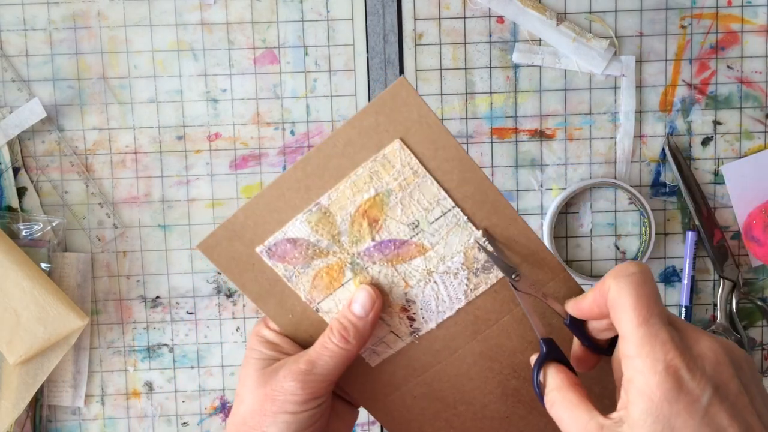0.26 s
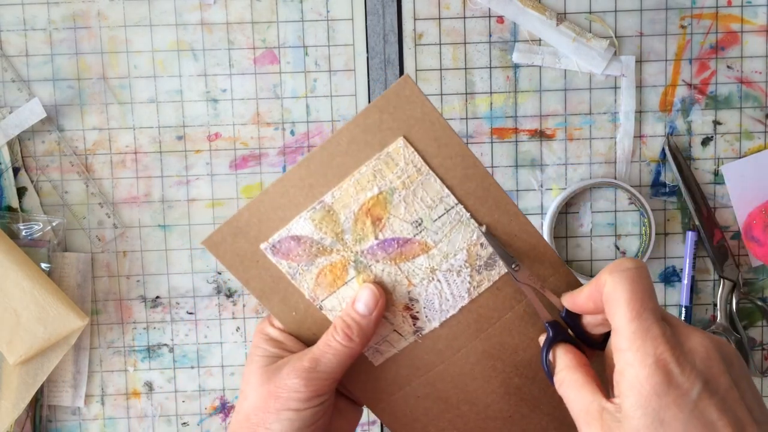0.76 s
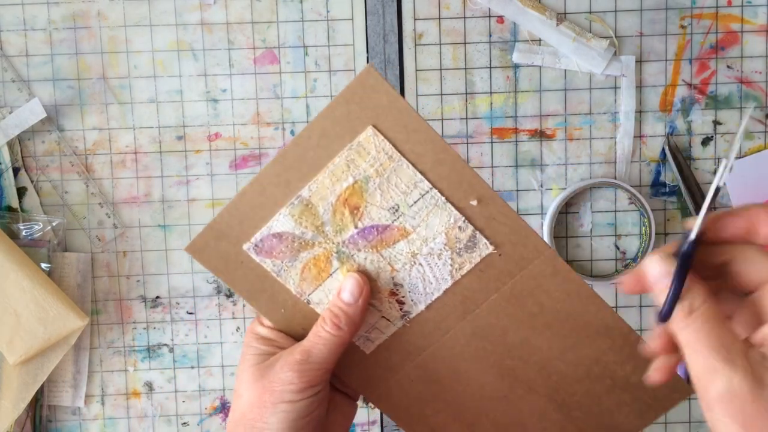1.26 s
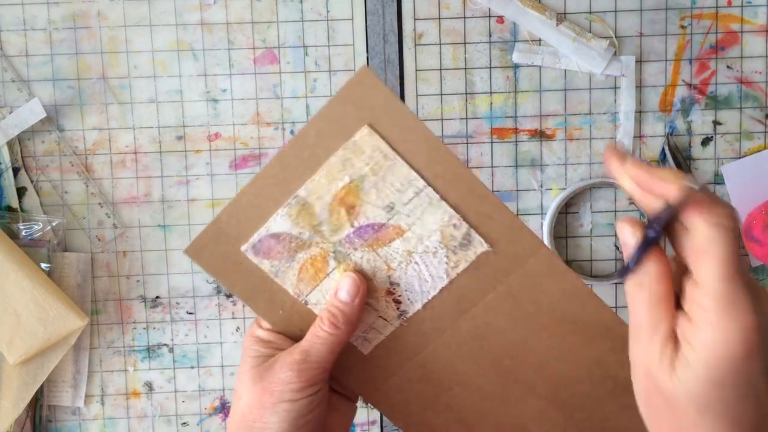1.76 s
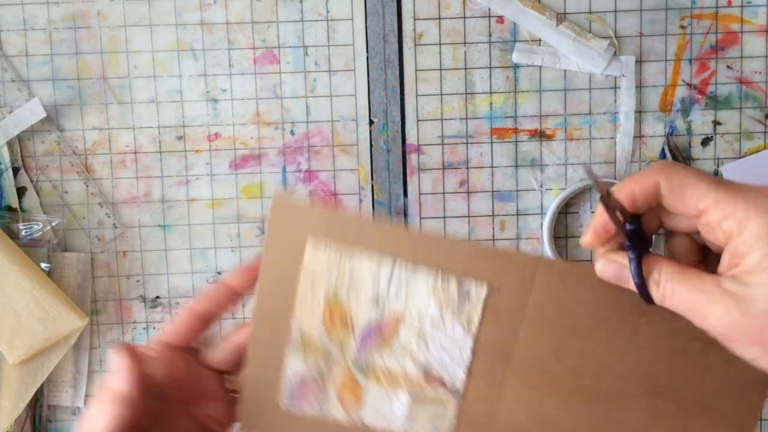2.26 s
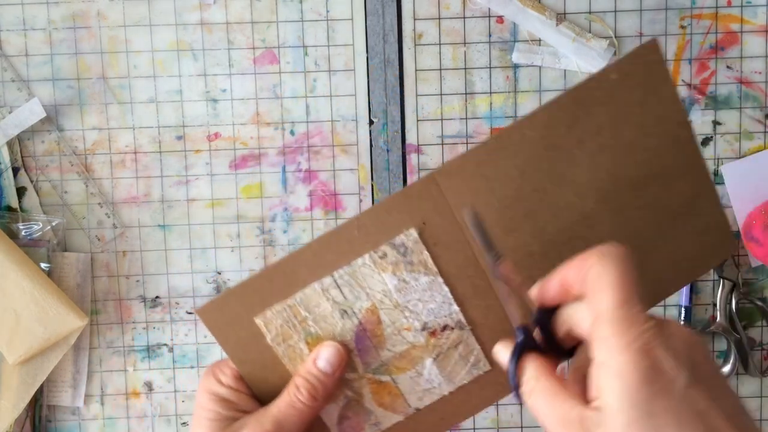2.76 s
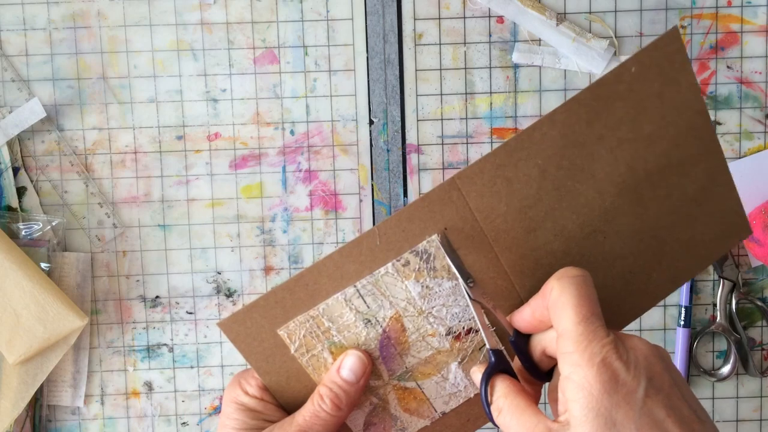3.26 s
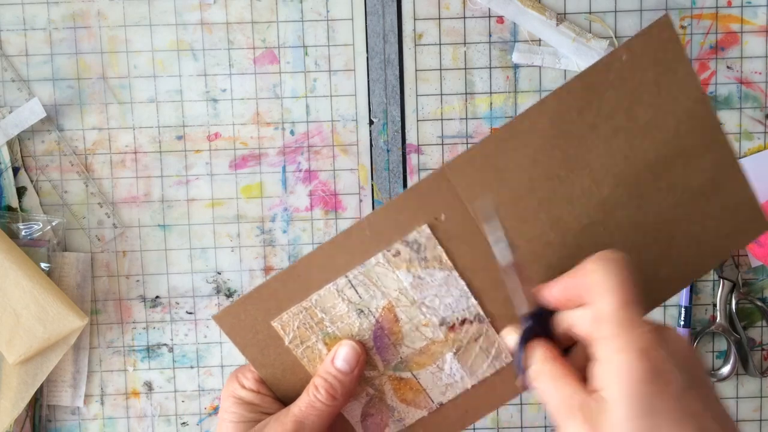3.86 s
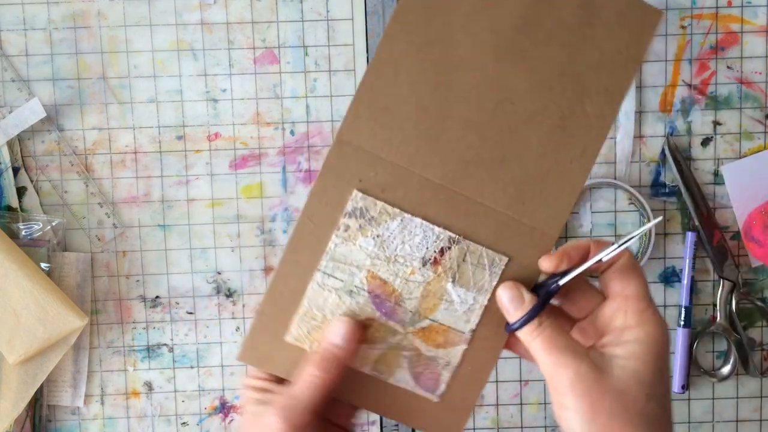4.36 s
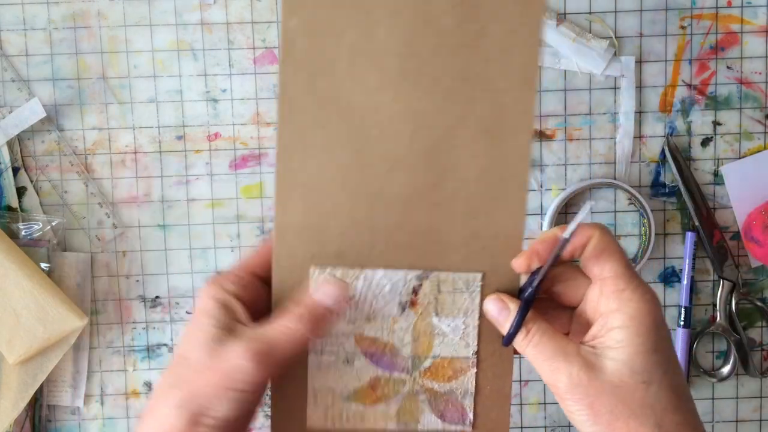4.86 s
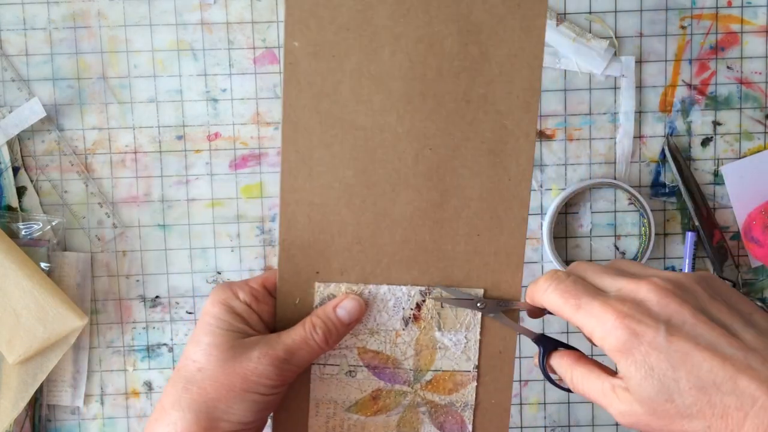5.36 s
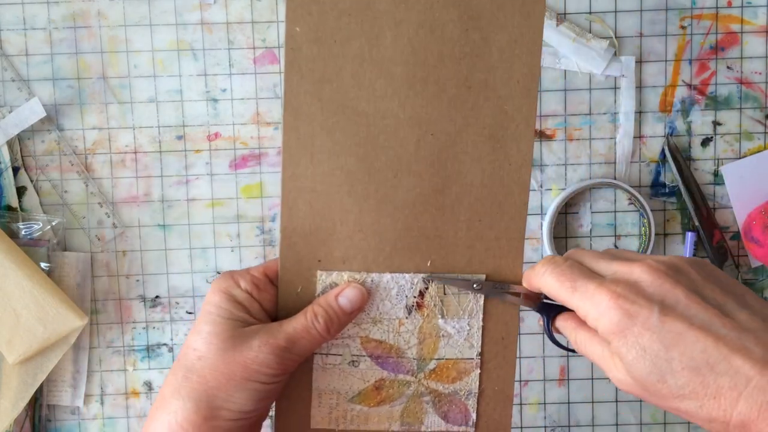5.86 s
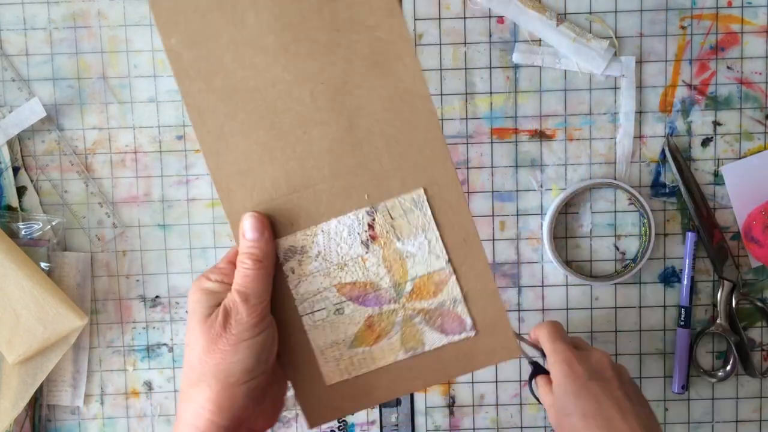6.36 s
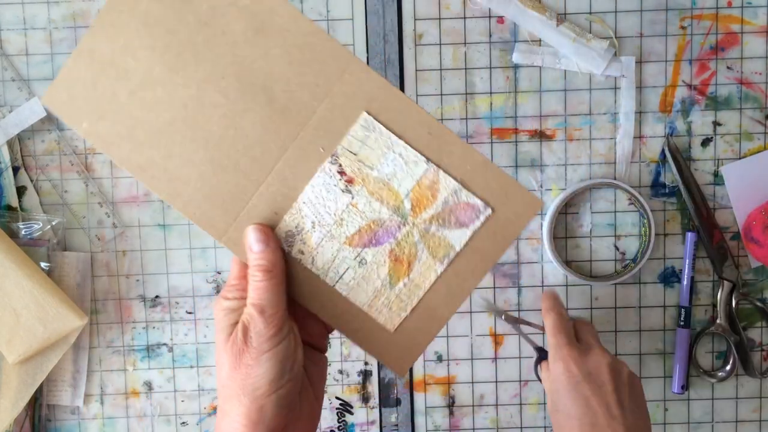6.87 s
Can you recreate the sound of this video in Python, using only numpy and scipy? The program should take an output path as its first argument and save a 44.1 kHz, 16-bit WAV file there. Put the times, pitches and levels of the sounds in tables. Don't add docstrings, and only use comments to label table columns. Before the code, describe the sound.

Close to the microphone in a small, fairly dry room, hands trim fabric threads on a stiff card. Faint pats and a snip come first, then a cluster of papery slaps as the card shifts, more ticks and knocks between soft rubs, a heavy landing around five seconds, light snips and taps, and a final slap and bright tick. Low steady hiss throughout.

```python
import sys
import numpy as np
from scipy import signal
from scipy.fft import rfft, irfft
from scipy.io import wavfile
from scipy.ndimage import uniform_filter1d

SR = 44100
rng = np.random.default_rng(int(sys.argv[2]) if len(sys.argv) > 2 else 0)


def pcm_store(signal):
    levels = np.round(np.clip(np.atleast_2d(signal), -1, 1) * 32767)
    wavfile.write(sys.argv[1], SR, levels.astype(np.int16).T)


def invert_db(x):
    u = np.asarray(x, float) / 20
    return 10 ** u


N = 313992

# start t/s, freest edge pitch f/Hz, flex tilt level/dB per octave
GRIPS = [(0, 1100, -2), (.2, 1680, 8), (.54, 1300, -2), (.915, 1300, 2.5), (1.02, 1150, 3), (1.5, 1270, -1),
         (1.578, 950, 0), (1.72, 1150, -2), (1.793, 950, -1.5), (1.88, 1290, 7.5), (2.09, 1150, -4.5),
         (2.199, 1550, 8), (2.566, 1100, -3.5), (2.69, 1490, 3), (2.97, 1370, 2), (3.4, 1130, 5),
         (4.33, 1230, 2.5), (4.538, 1500, 4), (4.64, 1210, -0.5), (4.95, 1000, 1.5), (5.12, 1150, 2),
         (5.87, 1110, 1.5), (6.2, 1290, 5), (6.49, 860, 1.5), (6.72, 1700, 5), (7.07, 1200, -1.5)]
# f/Hz, level/dB per Hz
SCRAPE = [(1060, -49), (1800, 0.5), (2080, -28), (3140, -6), (4880, -4.5), (7290, -4.5), (9000, -0.5),
          (15000, -0.5), (16000, -1.5)]
# share of length, level/dB
DRAG_SHAPE = [(0, -20), (.1, -10), (.3, -2.5), (0.701, -3), (1, -15)]
RING_S = .15


def evened(x):
    return x / np.sqrt(np.mean(x ** 2) + 1e-20)


def read(points, hz):
    f, value = np.transpose(points)
    return np.interp(np.log(hz + 1), np.log(f + 1), value)


def coloured(x, points):
    hz = np.fft.rfftfreq(len(x), 1 / SR)
    return irfft(rfft(x) * invert_db(read(points, hz)), len(x))


def add(mix, s, sound):
    part = mix[round(s * SR):][:len(sound)]
    part += sound[:len(part)]


def resonate(x, hz, width):
    r, w = np.exp(-np.pi * width / SR), 2 * np.pi * hz / SR
    return signal.lfilter([1 - r, 0, r - 1], [1, -2 * r * np.cos(w), r * r], x)


def body(x, modes):
    return sum((-1) ** k * invert_db(db) * resonate(x, hz, width) for k, (hz, width, db) in enumerate(modes))


def dulled(x):
    return signal.sosfilt(signal.butter(4, 2900, fs=SR, output="sos"), x)


def split(x):
    low = signal.sosfiltfilt(signal.butter(4, 8000, fs=SR, output="sos"), x)
    return low, x - low


def shares(top_db):
    top = np.clip(invert_db(top_db), 0, .98)
    return np.sqrt(1 - top ** 2), top


def strokes(rows, shape, size=1):
    power, (share, shape_db) = np.zeros((size, N)), np.transpose(shape)
    for s, length, *levels in rows:
        t = np.arange(0, length, 1 / SR)
        fade = np.clip(np.minimum(t / .002, (length - t) / .006), 0, 1)
        for layer, db in zip(power, levels):
            gain = fade * invert_db(db + np.interp(t / length, share, shape_db))
            add(layer, s, gain ** 2)
    return power


def gripped(s):
    # f/Hz, bandwidth f/Hz, level/dB
    flex_modes = [(56.4, 60, -5.5), (96.3, 25, -2), (155.3, 26.3, 4.5), (229, 46, 1), (318.4, 47.4, 3),
                  (446, 56.6, -0.5), (550, 40, -5), (662, 29, -8.5), (741, 73, -13)]
    # f/Hz, bandwidth f/Hz, level/dB
    edge_modes = [(903, 84, 2), (985, 89, 1.5), (1090, 74, 3.5), (1255, 35, 1.5), (1580, 166, -4),
                  (1862, 41, 1.5), (2150, 205, -3.5)]
    _, free_hz, db_per_octave = [row for row in GRIPS if row[0] <= max(s, GRIPS[0][0])][-1]
    edge = [(hz, width, db - 11 * abs(np.log2(hz / free_hz))) for hz, width, db in edge_modes]
    flex = [(hz, width, db + db_per_octave * np.log2(hz / 300)) for hz, width, db in flex_modes]
    return edge, flex


def room_tone():
    # f/Hz, level/dB per Hz
    tone_spectrum = [(15, -36), (25, -2.5), (65, -1.5), (159, -4), (321, -11), (510, -14), (617, -15.5),
                     (1090, -17), (1220, -16.5), (1470, -19), (2210, -21), (15200, -29.5), (16500, -44)]
    frames, hz = N // 256 + 5, np.fft.rfftfreq(1024, 1 / SR)
    a, b, patches = rng.standard_normal((frames, 513, 3)).T
    patches = evened(uniform_filter1d(uniform_filter1d(patches, 12, 0), 12, 1))
    depth_db = read([(400, 3), (2500, 1.2)], hz)[:, None]
    z = (a + 1j * b) * invert_db(read(tone_spectrum, hz)[:, None] + depth_db * patches)
    noise = signal.istft(z, nperseg=1024, noverlap=768)[1][:N]
    return invert_db(-69) * evened(noise)


def pop(db, hz, t60):
    t = np.arange(0, t60, 1 / SR)
    rise = 1 - np.exp(-t * hz / 0.32)
    return invert_db(db - 60 * t / t60 + 1.0) * rise * np.sin(2 * np.pi * hz * t)


def single_rings(table):
    # t/s, level/dB,
    # f/Hz, t60/s
    rings = [(1.5392, -22.5, 332, 0.029), (1.562, -38, 160, .07), (1.752, -37, 155, .07),
             (3.808, -51, 160, .06), (5.028, -34, 600, .045), (2.255, -57, 330, .05),
             (1.5752, -29, 320, 0.019), (1.579, -27.5, 532, 0.038), (1.602, -33, 170, .06),
             (1.613, -36, 316, 0.041), (1.751, -23, 300, 0.019), (1.759, -38.5, 1150, 0.038),
             (1.785, -26, 216, 0.037), (1.7945, -28, 497, 0.045), (1.805, -32, 170, 0.083),
             (1.821, -51, 1820, .03), (1.831, -37, 302, 0.038), (2.587, -34.5, 324, 0.029),
             (2.595, -34, 277, 0.028), (2.601, -38.5, 205, 0.063), (4.686, -43.5, 244, .04),
             (5.0089, -32, 137, .04), (5.009, -36.5, 1130, 0.022), (5.0273, -26, 980, 0.011),
             (5.043, -23, 435, 0.024), (5.052, -27, 333, 0.032), (5.08, -40, 332, 0.074),
             (5.881, -54, 454, 0.044), (5.886, -53, 3100, .02), (5.928, -38, 1120, 0.018),
             (5.93, -49.5, 432, 0.1), (5.9743, -48.5, 2800, 0.019), (6.045, -54.5, 1780, .03),
             (6.281, -53, 1290, 0.028), (6.283, -55.5, 168.5, 0.25), (6.5019, -28.5, 433, 0.024),
             (6.5092, -30, 570, 0.026), (6.521, -33, 320, 0.069), (6.8249, -40.5, 176, .05),
             (6.832, -53.5, 2150, 0.045), (6.841, -49, 994, 0.036), (6.995, -52, 330, 0.049),
             (7.057, -50, 300, 0.025), (7.085, -42, 260, 0.03), (7.0925, -37, 298, 0.032),
             (.018, -59, 250, 0.035), (.038, -53, 280, 0.035), (.0795, -55, 420, 0.028),
             (.9318, -31, 1580, 0.015), (.979, -40, 6000, 0.0086), (.979, -44, 14600, .006),
             (.967, -47, 14900, .008), (1.5395, -30.5, 1280, 0.024), (1.552, -33.5, 3050, .02),
             (5.044, -31, 567, 0.058), (5.02, -32, 197, 0.053), (6.5025, -38, 768, 0.047),
             (6.513, -35.5, 270, 0.059), (2.113, -55, 395, 0.036), (2.143, -58, 1090, 0.024),
             (2.5935, -35, 2800, 0.012), (2.5935, -32, 5100, 0.0072), (3.0112, -55, 1210, .015),
             (3.019, -35, 1390, 0.0061), (3.0192, -47, 3900, .005), (2.117, -46, 240, .03),
             (2.143, -53, 4050, .015), (4.997, -46, 1150, .03), (5.0265, -33, 1800, .012),
             (5.0255, -36, 3300, .008), (4.4085, -45, 1850, .02), (4.4222, -33, 5400, .008),
             (4.417, -41, 160, .05), (1.751, -38, 1700, .012), (1.772, -41, 1680, .02),
             (4.3695, -36.5, 1163, 0.027), (4.4225, -28.5, 288, 0.022), (4.4222, -34, 1880, .015),
             (4.7035, -29.5, 199, .04), (4.703, -42, 557, .03), (4.733, -32.5, 1250, 0.041),
             (4.737, -36.5, 350, 0.033), (6.502, -34.5, 9000, 0.01), (6.556, -54, 9800, .015),
             (6.31, -56, 1110, .03), (6.325, -53.5, 1360, .03), (6.556, -48, 885, 0.026),
             (6.764, -57, 13500, .015), (5.048, -53, 14900, .05), (5.06, -56, 12500, .025),
             (4.7, -54, 14500, .03), (1.786, -40, 1100, .03)]
    # t/s, level/dB, f/Hz, t60/s
    pats = [
        (3.474, -57, 211, 0.054),
        (3.546, -59, 229, 0.05),
        (3.592, -60, 234, 0.055),
        (3.638, -51, 270, 0.055),
            (0.161, -57, 322, 0.058),
        (0.279, -53, 377, 0.056),
        (0.431, -59, 350, 0.05),
        (0.586, -55, 316, 0.046),
        (0.742, -60, 463, 0.05),
    ]
    for s, *row in rings + pats:
        add(table, s, pop(*row))


def hit(s, tick_db, top_db, knock_db, thud_db, t60, chance):
    t, (edge, flex) = np.arange(len(chance)) / SR, gripped(s)
    crack = chance * (invert_db(-60 * t / .005) + invert_db(-9 - 60 * t / t60))
    crack[2] += 1.5
    low, top = split(coloured(crack, SCRAPE) * (t < .07))
    low_gain, top_gain = shares(top_db)
    tick = low_gain * low / abs(low).max() + invert_db(2.5) * top_gain * top / abs(top).max()
    blow = chance[::-1] * invert_db(-60 * t / (1.37 * t60))
    blow[0] -= 9
    knock = dulled(sum(invert_db(db) * resonate(blow, hz, width) for hz, width, db in edge))
    thud = dulled(sum(invert_db(db) * resonate(blow, hz, width) for hz, width, db in flex))
    damped = invert_db(-60 * t / (9.6 * t60))
    knock = damped * knock / abs(knock).max()
    thud = np.sqrt(damped) * thud / abs(thud).max()
    return invert_db(tick_db - 4.0) * tick + invert_db(knock_db - 7.0) * knock + invert_db(thud_db + 1.0) * thud


def blows(table):
    # t/s, tick level/dB, edge knock level/dB, thud level/dB
    knocks = [(0.0189, -48.5, -52, -53), (0.0784, -40, -68, -45), (0.9316, -24.5, -30.5, -38),
              (1.5877, -35, -33, -41), (1.7509, -44, -33, -39), (2.142, -59, -39, -43),
              (2.5707, -34, -61, -47.5), (3.0195, -46, -34.5, -48), (3.639, -57, -54, -57),
              (4.997, -44, -42, -67), (5.0075, -44, -52, -50), (5.016, -49, -48, -38),
              (5.0258, -25, -22, -33.5), (5.885, -41, -39.5, -81), (5.973, -29, -58, -57),
              (6.0108, -43, -45, -70)]
    # t/s, tick level/dB, edge knock level/dB, thud level/dB, t60/s
    snips = [(.979, -32, -46, -42.5, 0.043), (1.539, -25, -24, -33.5, 0.066), (1.7573, -53, -31, -57, 0.09),
             (2.106, -54, -59, -50.5, 0.059), (2.4064, -45, -43, -74, 0.057),
             (2.594, -21, -27, -41.5, 0.025), (3.8246, -25, -60, -46.5, 0.037),
             (4.369, -30, -27, -40, 0.032), (4.4218, -16, -30, -54, 0.022), (4.686, -42, -42, -43, 0.02),
             (5.9283, -37.5, -43, -61, 0.063), (6.0443, -41.5, -39.5, -50.5, 0.063),
             (6.5019, -32.5, -56, -45.5, 0.051), (6.828, -43, -47, -52, 0.066)]
    # t/s, tick level/dB, its top octave level/dB
    ticks = [(.688, -60.5, -4), (.745, -52, -6), (0.9042, -42.5, -4.5), (1.054, -48, -12), (3.947, -53, -3),
             (1.3225, -51, -2), (1.3748, -55.5, -7), (1.638, -37.5, -6), (1.7874, -25, -7),
             (1.859, -36.5, -19), (2.01, -37, -2), (2.1702, -47, 2), (3.7867, -54, 5), (3.8033, -38, -1),
             (4.1862, -44, -14), (4.2333, -51, -0.5), (4.544, -34, 0), (6.6906, -44.5, -1),
             (6.7793, -32, -8), (7.1002, -23.5, -7)]
    rows = [(s, db, top_db, db - 49, db - 58, 0.042) for s, db, top_db in ticks]
    rows += [(s, db, -12.5, knock_db, thud_db, t60) for s, db, knock_db, thud_db, t60 in snips]
    rows += [(s, db, -37, knock_db, thud_db, 0.045) for s, db, knock_db, thud_db in knocks]
    for (s, *row), chance in zip(rows, rng.standard_normal((len(rows), 4096))):
        add(table, s, hit(s, *row, chance))


def slips(per_s, spread_db, dense):
    sizes = invert_db(spread_db * np.minimum(rng.exponential(1, N), 3))
    catches = sizes * (rng.random(N) < per_s / SR)
    bursts = evened(signal.lfilter([1], [1, -.95], catches))
    return evened(rng.standard_normal(N) * (dense + bursts))


def patchy(x, patch_db, flutter_db):
    z = signal.stft(x, nperseg=256)[2]
    field = rng.standard_normal(z.shape[::-1]).T
    patches = evened(uniform_filter1d(uniform_filter1d(field, 4, 0), 14, 1))
    flutter = evened(uniform_filter1d(field[0], 4))
    return signal.istft(z * invert_db(patch_db * patches + flutter_db * flutter), nperseg=256)[1][:N]


def fibre_hiss():
    # f/Hz, bandwidth f/Hz, level/dB
    sheet_modes = [(2270, 300, -2), (3224, 300, 8.5), (3830, 1170, -1.5), (5710, 1000, 8), (6800, 970, 0.5),
                   (7640, 330, 9)]
    rub = slips(per_s=600, spread_db=4.2, dense=1.8)
    hiss = evened(coloured(rub, SCRAPE)) + invert_db(-4) * evened(body(rub, sheet_modes))
    return patchy(hiss, patch_db=2.3, flutter_db=1.0)


def rubbing(low, top):
    # start t/s, length t/s, fibre hiss level/dB, edge drive level/dB
    skids = [(.078, 0.058, -53, -53), (.933, 0.15, -59, -59), (1.022, 0.16, -70, -60.5),
             (1.565, 0.026, -36.5, -43), (1.585, 0.045, -46, -37), (1.795, 0.043, -59, -42.5),
             (2.596, 0.065, -48.5, -47), (3.02, 0.15, -62.5, -54), (3.78, 0.27, -64.5, -60),
             (4.371, 0.037, -47, -40.5), (4.424, 0.027, -45, -59), (4.687, 0.14, -59, -49),
             (4.745, 0.032, -52, -52), (5.04, 0.066, -52, -38.5), (5.08, 0.36, -66.5, -67),
             (6.503, 0.14, -56, -57), (6.826, 0.2, -60.5, -57.5), (7.083, 0.028, -52, -48)]
    skid_shape = [(0, -2.5), (.5, -16.5), (1, -55)]
    # start t/s, length t/s, fibre hiss level/dB, edge drive level/dB
    slides = [(.22, 0.28, -68.5, -67), (.55, 0.46, -80.5, -73), (1.08, .17, -68, -71),
              (1.75, 0.055, -43, -49), (1.89, 0.15, -63.5, -64), (2.09, 0.32, -64, -63),
              (2.03, 0.088, -71, -69), (2.37, 0.22, -72.5, -69), (2.48, 0.17, -54, -59.5),
              (2.73, 0.055, -67, -71), (2.79, 0.11, -67.5, -71), (3.55, 0.11, -101, -72),
              (3.82, 0.11, -71, -72), (4.08, 0.089, -71.5, -81), (4.39, 0.039, -56.5, -49.5),
              (4.435, 0.11, -47.5, -49.5), (5.12, 0.18, -67, -66), (5.72, 0.18, -79, -72),
              (5.86, 0.21, -75, -68), (6.235, 0.29, -57.5, -68.5), (6.52, 0.063, -54.5, -51),
              (6.76, 0.05, -65, -69), (6.915, 0.13, -58, -60), (5.28, 0.36, -84, -74.5),
              (6.98, 0.16, -60, -73), (7.1, 0.043, -54, -65)]
    # start t/s, length t/s, fibre hiss level/dB, edge drive level/dB, top octave level/dB
    swipes = [
        (0.961, 0.013, -50, -61, -11),
        (1.539, 0.027, -38.5, -38, -4.5),
        (2.137, 0.015, -60, -54, -14),
        (2.22, 0.165, -53, -57.5, -3),
        (2.567, 0.028, -48, -45, -9),
        (3.906, 0.05, -66.5, -70, -18),
        (4.542, 0.023, -49, -52, -6),
        (4.71, 0.037, -38.5, -42, -2),
        (5.008, 0.033, -48, -39, -11),
        (6.044, 0.037, -66.5, -67, -12),
    ]
    swipe_shape = [(0, -15), (.2, -2), (.8, 1.5), (1, -9.5)]
    low_power, top_power, edge_power = np.zeros((3, N))
    groups = [(slides, DRAG_SHAPE, -4), (skids, skid_shape, -8)]
    groups += [([row], swipe_shape, top_db) for *row, top_db in swipes]
    for rows, shape, top_db in groups:
        hiss, edge = strokes(rows, shape, size=2)
        low_gain, top_gain = shares(top_db)
        full_db = max(db for _, db in shape)
        steep = [(share, db + .3 * (db - full_db)) for share, db in shape]
        low_power = low_power + low_gain ** 2 * hiss
        top_power = top_power + top_gain ** 2 * strokes(rows, steep)[0]
        edge_power = edge_power + edge
    return low * np.sqrt(low_power) + top * np.sqrt(top_power), np.sqrt(edge_power)


def shaken(drive, gain, modes):
    power = sum(invert_db(2 * db) * width for _, width, db in modes) * np.pi / SR
    return dulled(body(gain * drive, modes)) / np.sqrt(power)


def flexing():
    # start t/s, length t/s, flex drive level/dB
    jolts = [(.08, 0.079, -53.5), (.95, 0.14, -54.5), (1.539, 0.13, -40.5), (1.572, 0.073, -34),
             (1.752, 0.12, -35), (1.785, 0.073, -37), (2.12, 0.13, -57), (2.565, 0.085, -46),
             (3.02, 0.1, -66), (3.808, 0.06, -56), (4.371, 0.045, -47.5), (4.415, 0.022, -40),
             (4.7, 0.12, -42), (5.003, 0.079, -36.5), (5.025, 0.092, -36.5), (5.875, 0.29, -59),
             (6.503, 0.079, -36.5), (6.826, 0.12, -55), (7.083, 0.086, -44)]
    jolt_shape = [(0, 0), (.1, 2), (.4, -8.5), (1, -24)]
    # start t/s, length t/s, flex drive level/dB
    sways = [(.22, 0.24, -61), (.53, 0.2, -64), (1, 0.14, -66.5), (2.2, 0.29, -65), (3.45, 0.26, -69.5),
             (3.74, 0.13, -62.5), (4.43, 0.16, -58.5), (5.6, 0.31, -69), (6.26, 0.08, -61),
             (6.45, 0.056, -65.5), (6.885, 0.15, -58.5)]
    return np.sqrt(strokes(jolts, jolt_shape) + strokes(sways, DRAG_SHAPE))[0]


def singing(drive):
    sings = [(0.27, 0.19, -73.5, 1625), (0.25, 0.07, -66, 470), (1.596, 0.15, -76, 1570),
             (2.15, 0.08, -67, 1630), (2.21, 0.12, -61, 1610), (2.256, .11, -59, 1034),
             (2.248, 0.13, -66, 2390), (2.29, 0.092, -61, 3080), (3.027, 0.071, -60, 470),
             (4.706, 0.045, -49, 1810), (5.873, 0.087, -59.5, 1130), (2.513, 0.029, -67, 1740),
             (4.447, 0.076, -51.5, 1126), (4.453, 0.062, -55, 1870), (4.453, 0.074, -55.5, 2450),
             (4.46, 0.068, -56, 3200), (4.543, 0.018, -50, 2470), (5.967, 0.087, -61, 1114),
             (6.044, 0.041, -64, 1830), (6.305, 0.066, -65, 910), (6.307, 0.23, -66.5, 1265),
             (6.33, 0.2, -73, 1980), (6.937, 0.075, -61, 2090), (6.939, 0.081, -59.5, 662),
             (7.007, .04, -64, 1390)]
    width_hz = 52
    out = np.zeros(N)
    for s, length, db, hz in sings:
        at = slice(round(s * SR), round((s + length + RING_S) * SR))
        power = strokes([(s, length, db)], DRAG_SHAPE)[0][at]
        gain = np.sqrt(power * SR / (np.pi * width_hz))
        add(out, s, resonate(gain * drive[at], hz, width_hz))
    return out


def handling():
    low, top = map(evened, split(fibre_hiss()))
    shake = slips(per_s=150, spread_db=3, dense=1.6)
    reverse = shake[::-1]
    out, edge_gain = rubbing(low, top)
    out = out + singing(reverse)
    flex_gain = flexing()
    starts = [row[0] for row in GRIPS]
    for s, end in zip(starts, starts[1:] + [N / SR]):
        at = slice(round(s * SR), round((end + RING_S) * SR))
        held = np.arange(N)[at] < round(end * SR)
        edge, flex = gripped(s)
        edge_sound = shaken(shake[at], held * edge_gain[at], edge)
        flex_sound = shaken(reverse[at], held * flex_gain[at], flex)
        add(out, s, edge_sound + flex_sound)
    return out


def tap(db, hz, chance):
    t = np.arange(len(chance)) / SR
    ring = resonate(chance * invert_db(-60 * t / 0.04), hz, 72)
    return invert_db(db - 1.0) * ring / abs(ring).max()


def tapping(table):
    # t/s, level/dB, f/Hz
    taps = [(0.549, -66, 770), (0.586, -65, 1620), (0.632, -60, 1520), (0.706, -60.5, 1030),
            (0.745, -59, 1580), (0.722, -59, 1250), (0.885, -60, 1080), (1.055, -52, 1070),
            (3.492, -58.5, 1120), (3.548, -60, 1110), (3.749, -66, 1110), (5.653, -69, 910),
            (5.699, -66, 1150), (5.795, -55.5, 1140), (5.827, -56, 1110), (5.871, -60, 1120),
            (5.885, -48.5, 1120), (5.912, -49, 1120), (5.932, -45, 1130), (5.981, -54, 1100),
            (6.012, -52, 1120), (5.949, -61, 1120), (6.031, -54, 1110), (6.977, -44.5, 1074),
            (1.798, -42, 535), (1.588, -33, 490), (5.046, -35.5, 535), (4.727, -45, 1225),
            (6.985, -47, 2150)]
    for (s, *row), chance in zip(taps, rng.standard_normal((len(taps), 2048))):
        add(table, s, tap(*row, chance))


def cushion(db, build_s):
    t = np.arange(-.03, .01, 1 / SR)
    return -invert_db(db) * np.exp(np.where(t < 0, t / build_s, -t / 0.00091))


def landings(table):
    cushions = [
        (1.539, -37, 0.0024),
        (1.7506, -35, 0.0022),
        (4.686, -41, 0.0018),
        (5.008, -31, 0.0065),
        (6.5013, -38.5, 0.0038),
        (6.827, -50, .003),
        (7.085, -38, .005),
    ]
    for s, *row in cushions:
        add(table, s - .03, cushion(*row))


def room(x):
    # f/Hz, t60/s
    decay = [(150, 0.096), (1000, 0.17), (5000, 0.25), (15000, 0.19)]
    taps = np.zeros(SR // 2)
    at = np.arange(200, SR // 2 - 20, 20)
    taps[at + rng.integers(0, 20, len(at))] = rng.choice([-1., 1.], len(at))
    hz, t, z = signal.stft(taps, SR, nperseg=256)
    tail = signal.istft(z * invert_db(-60 * t / read(decay, hz)[:, None]), SR, nperseg=256)[1]
    return signal.fftconvolve(x, tail / np.linalg.norm(tail))[:N]


def scene():
    table = handling()
    blows(table)
    tapping(table)
    landings(table)
    single_rings(table)
    return (table + invert_db(-19.0) * room(table) + room_tone())[None]


def starve(x):
    # t/s, severity (about 0-1)
    starved = [(.065, .55), (.42, 1), (.465, 1), (.63, 1), (1.615, 1.1), (1.63, 1), (2.32, .7), (2.67, 1),
               (2.715, 1), (3.16, 1), (5.11, .85), (5.715, .85), (5.76, .85), (5.83, .85), (6.365, .65),
               (6.62, .9), (6.85, .8)]
    window, lost = np.sin(np.pi * (np.arange(2048) + .5) / 2048), np.zeros(N)
    hz = np.fft.rfftfreq(2048, 1 / SR)
    for s, severity in starved:
        start = 214 + 1024 * (round((s * SR - 214) / 1024) - 1)
        z = rfft(x[start:start + 2048] * window)
        nearby = uniform_filter1d(abs(z), 60)
        bar = severity * nearby * np.interp(hz, [1200, 2200, 9000], [0, 1.5, 2.2])
        add(lost, start / SR, window * irfft(z * (abs(z) < bar)))
    return x - lost


def roll_off(x):
    return signal.sosfilt(signal.butter(12, 16750, fs=SR, output="sos"), x)


def record(dry):
    lowpass = signal.firwin(255, 15900, window=("kaiser", 5), fs=SR)
    x = signal.oaconvolve(dry[0], lowpass, "same")
    x = signal.sosfilt(signal.butter(3, 47, "high", fs=SR, output="sos"), x)
    return roll_off(starve(x)[None])


dry = scene()
out = record(dry)
pcm_store(out)
```